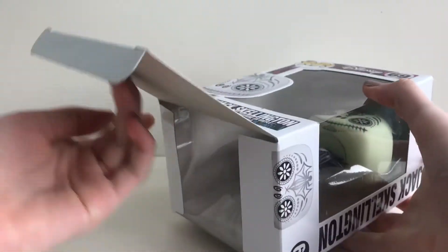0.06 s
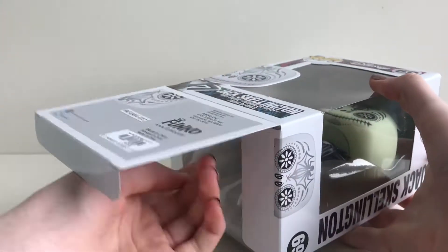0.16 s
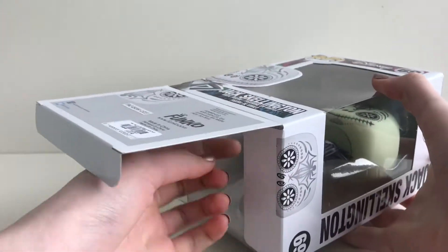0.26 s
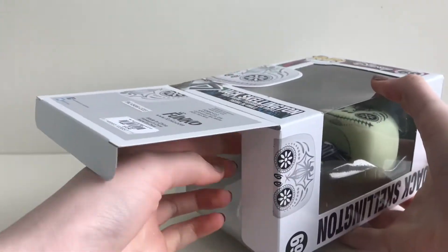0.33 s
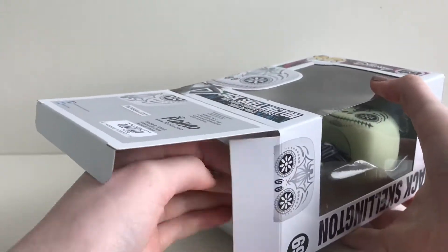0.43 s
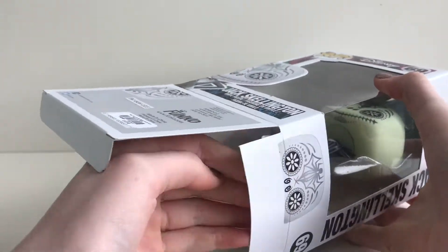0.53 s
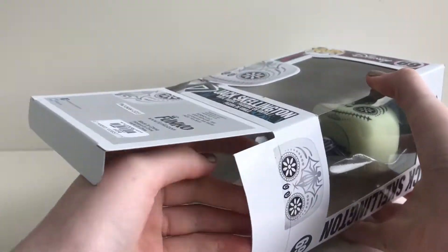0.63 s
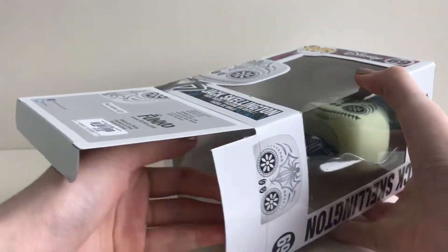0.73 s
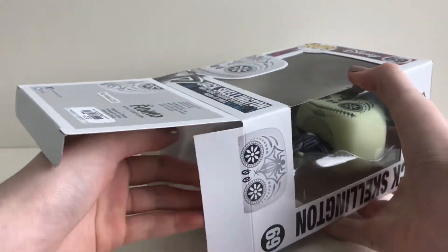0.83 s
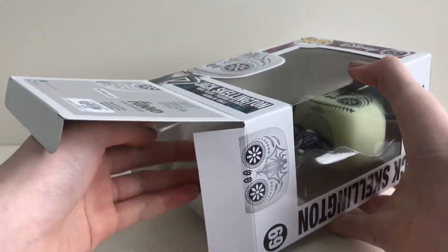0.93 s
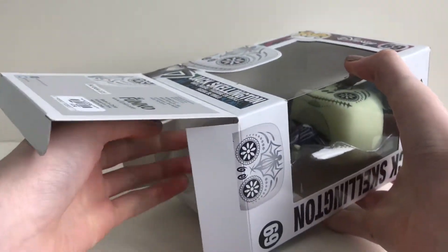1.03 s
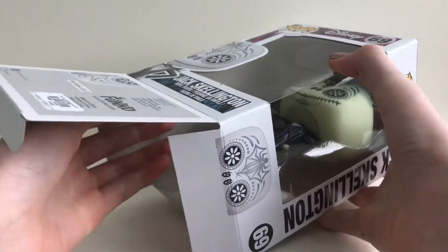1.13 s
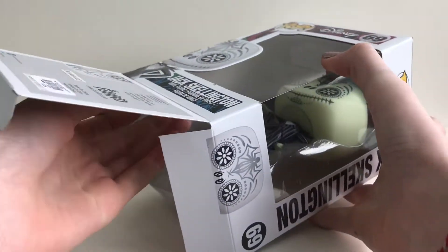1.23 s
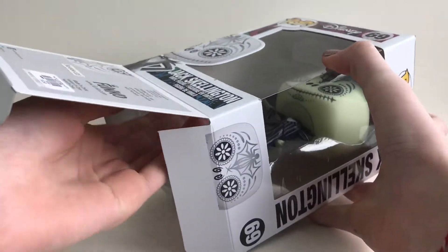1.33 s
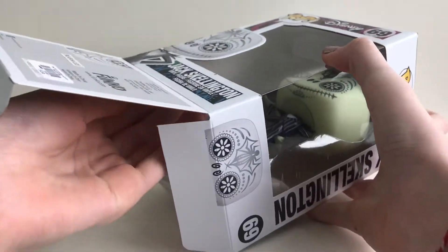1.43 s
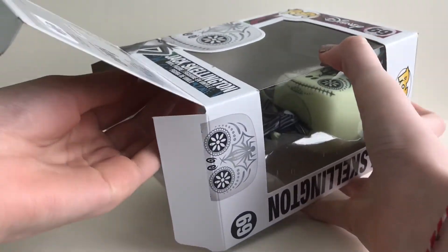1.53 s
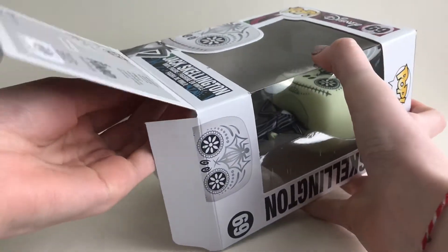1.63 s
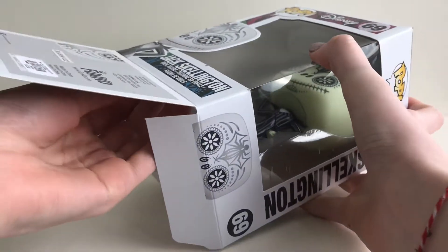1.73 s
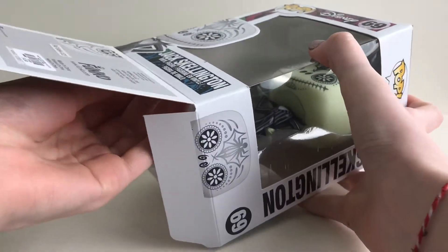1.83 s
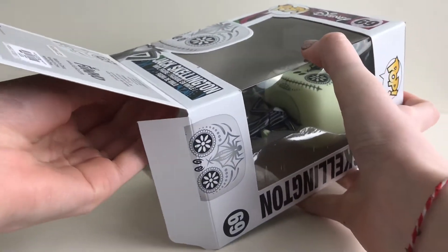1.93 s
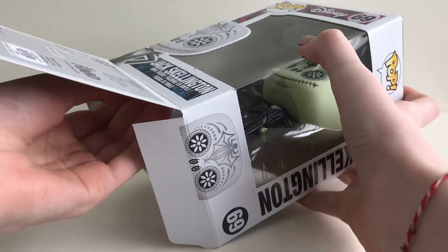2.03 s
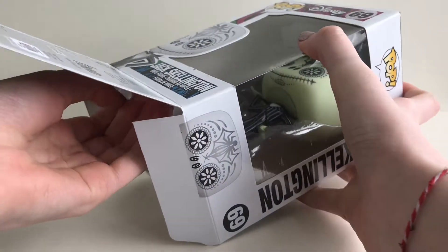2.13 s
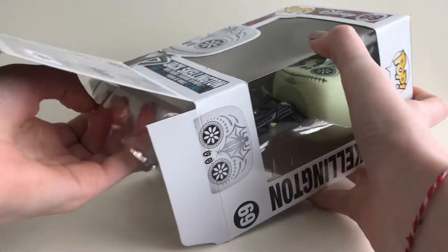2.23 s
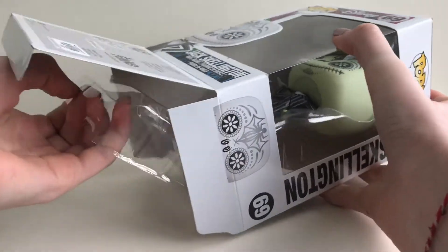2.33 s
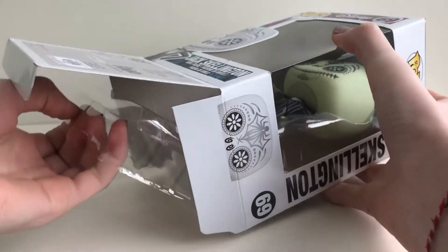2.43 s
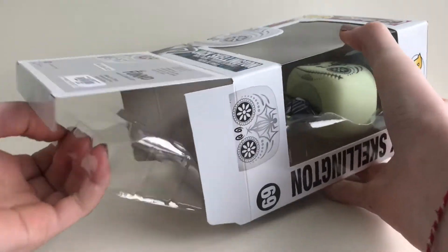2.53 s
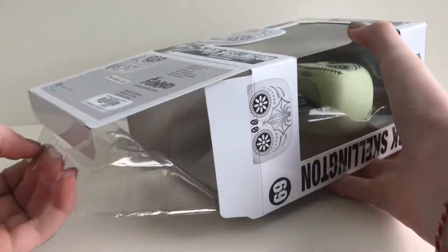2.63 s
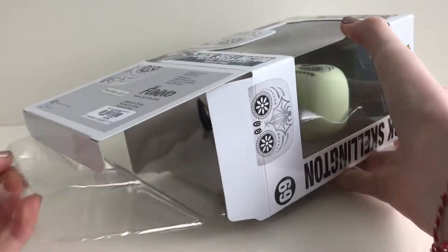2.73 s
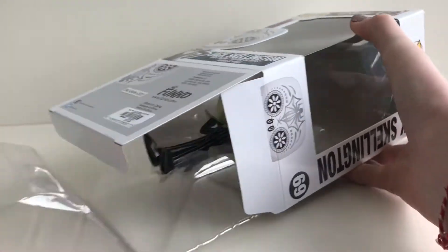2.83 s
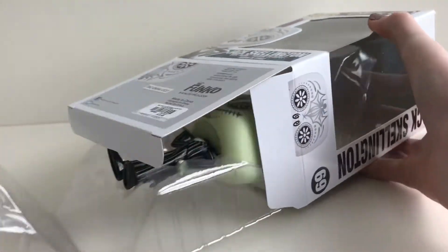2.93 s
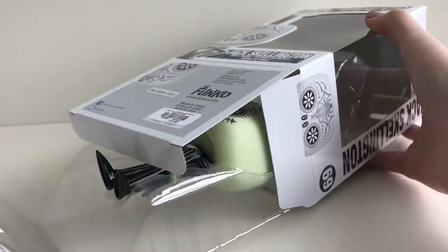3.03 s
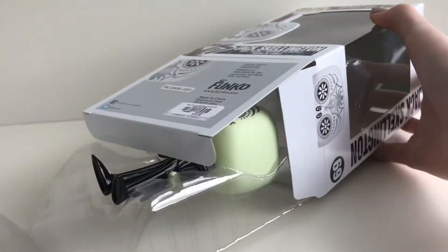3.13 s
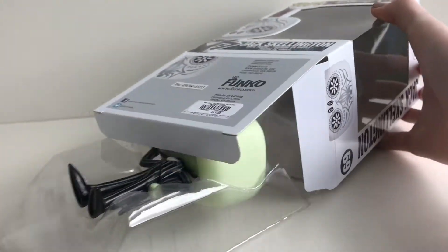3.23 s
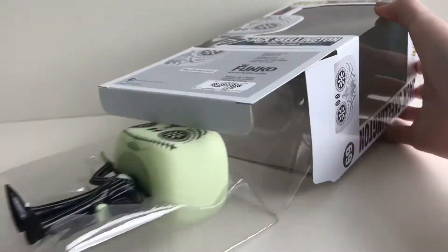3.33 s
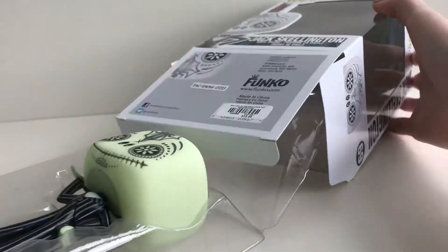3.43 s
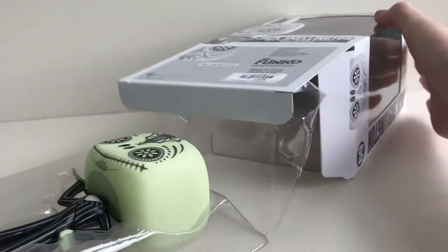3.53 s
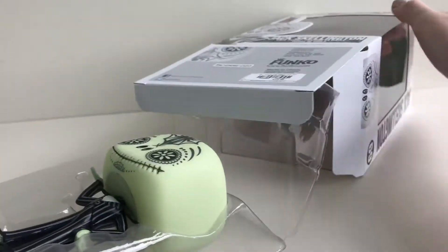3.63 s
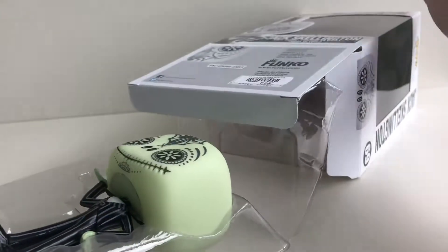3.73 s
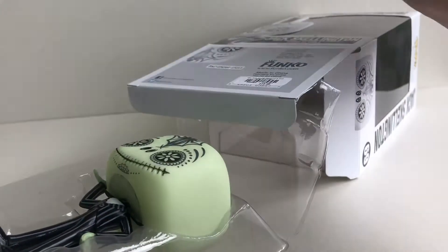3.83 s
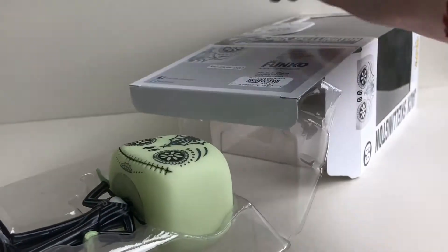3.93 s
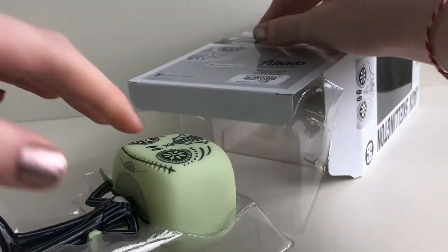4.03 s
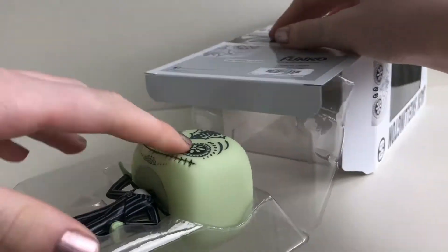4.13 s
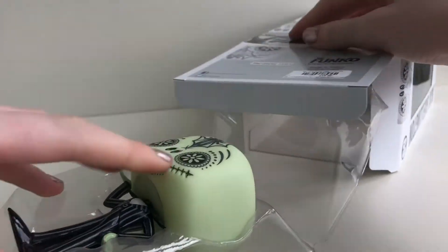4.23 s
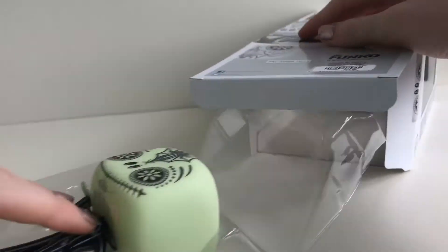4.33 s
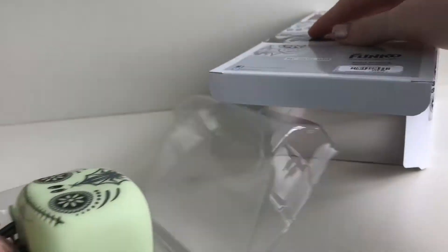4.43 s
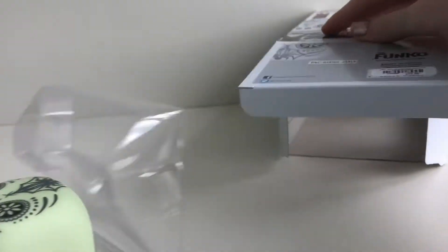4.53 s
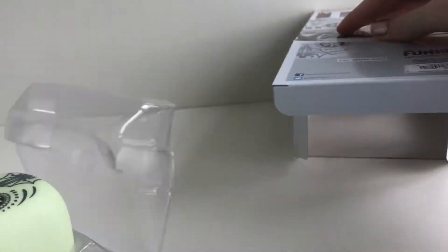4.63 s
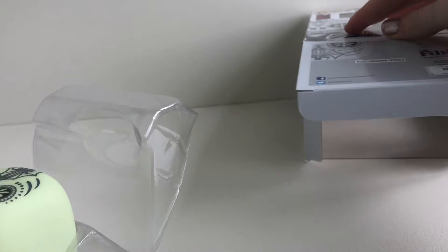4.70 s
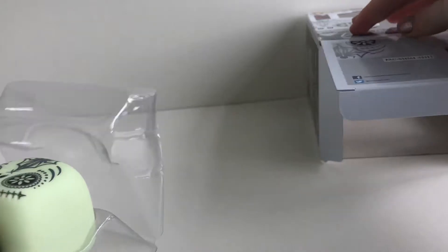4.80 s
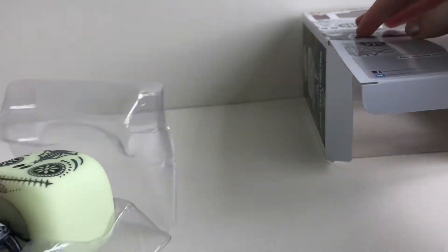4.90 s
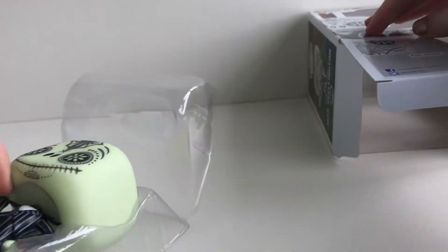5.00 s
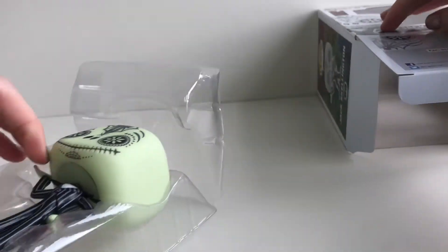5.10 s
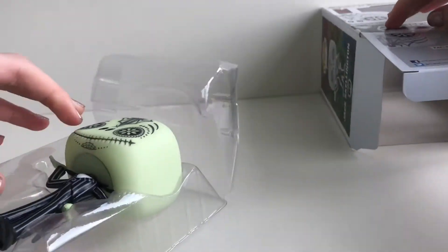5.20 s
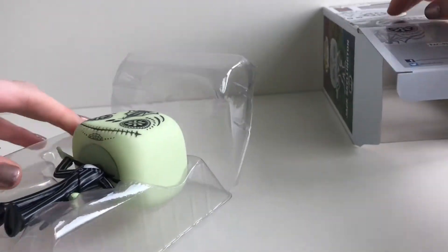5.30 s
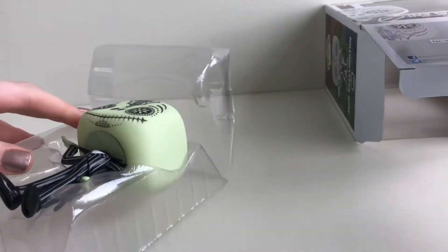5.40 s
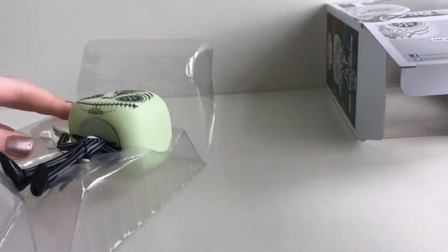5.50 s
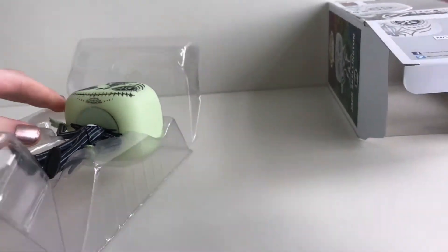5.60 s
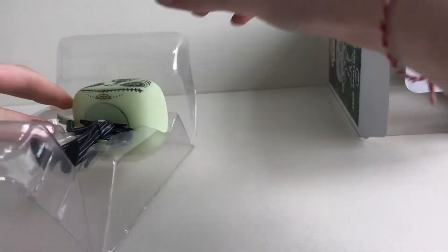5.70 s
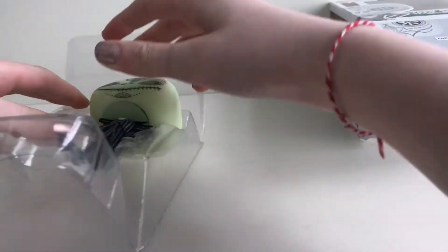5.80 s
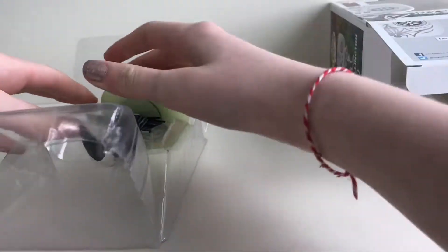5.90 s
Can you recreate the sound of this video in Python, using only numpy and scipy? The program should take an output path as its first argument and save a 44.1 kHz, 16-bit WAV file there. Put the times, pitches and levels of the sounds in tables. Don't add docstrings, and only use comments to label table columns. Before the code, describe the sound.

Soft card rubbing and knocks give way to very loud plastic snaps, crackling scrapes, hollow box thumps and a squeaky slide across a tabletop.

```python
import sys
import numpy as np
from scipy import signal
from scipy.fft import rfft, irfft
from scipy.io import wavfile
from scipy.ndimage import uniform_filter1d

SR = 44100
rng = np.random.default_rng(int(sys.argv[2]) if len(sys.argv) > 2 else 0)


def voltage_ratio(level):
    return 10 ** (np.asarray(level, float) / 20)


def unload_audio(sound):
    columns = np.transpose(np.atleast_2d(sound))
    steps = np.round(np.clip(columns, -1, 1) * 32767)
    wavfile.write(sys.argv[1], SR, steps.astype(np.int16))


N = 262615


def level(x, db):
    return x * voltage_ratio(db) / np.sqrt(np.mean(x ** 2))


def colour(x, table):
    hz, db = np.transpose(table)
    f = np.maximum(np.fft.rfftfreq(len(x), 1 / SR), 1)
    gain = voltage_ratio(np.interp(np.log(f), np.log(hz), db, -90, -90))
    return irfft(rfft(x) * gain, len(x))


def walk(rate_hz):
    hold = int(SR / rate_hz)
    steps = np.repeat(rng.standard_normal(N // hold + 1), hold)
    return 1.36 * uniform_filter1d(uniform_filter1d(steps, hold), hold)[:N]


def slips(rate_hz, spread_db, patchy_db):
    chance, size_draw, side = rng.random((3, N))
    size = voltage_ratio(np.minimum(-spread_db * np.log(size_draw + 1e-9), 15)) * np.sign(side - .5)
    return (chance < rate_hz / SR) * size * voltage_ratio(patchy_db * walk(90))


def peak(x, hz, q):
    return signal.lfilter(*signal.iirpeak(hz, q, SR), x)


def resonate(x, modes, shift_db=2):
    out = np.zeros(N)
    for k, (hz, width_hz, db) in enumerate(modes):
        grip = voltage_ratio(db + shift_db * walk(20))
        out += (-1) ** k * grip * peak(x, hz, hz / width_hz)
    return out


def swells(rows):
    roundness, floor_s = 1.41, .0015
    s, swell, fade, db = np.array(rows, float).T[:, :, None]
    coarse = np.arange(0, N + 64, 64)
    late = coarse / SR - s
    away = np.abs(late) / np.maximum(np.where(late < 0, swell, fade), floor_s)
    power = np.sum(voltage_ratio(2 * db - 20 * away ** roundness), axis=0)
    return np.interp(np.arange(N), coarse, power + 1e-16)


# f/Hz, level/(dB per Hz)
AIR_SPECTRUM = [(18, -51), (30, -28), (43, -0.5), (64, 2), (88, 3.5), (344, -25.5), (447, -25),
                (775, -27.5), (907, -24.5), (15800, -40)]
AIR_DB = -61.5 + 0.5


def background():
    hum_hz, hum_db, hum_end_s, hum_fade_s = 194, -65, 2.3, 0.43
    t = np.arange(N) / SR
    phase = 2 * np.pi * np.cumsum(hum_hz + 4.0 * walk(25)) / SR
    hum = np.sin(phase) * voltage_ratio(hum_db + 3.5 * walk(12))
    air = level(colour(rng.standard_normal(N), AIR_SPECTRUM), AIR_DB)
    return air + hum * np.clip((hum_end_s - t) / hum_fade_s, 0, 1)


# f/Hz, level/(dB per Hz)
THUMP_SPECTRUM = [(15, -47.5), (25, -6.5), (59, -3), (92, -3.5), (150, -1), (216, 0.5), (242, -3),
                  (320, -0.5), (420, -11.5), (700, -120)]
# heaviest t/s, swell/s, fade/s, level/dB
THUMPS = [(.24, 0.018, 0.03, -33.5), (.51, 0.064, 0.13, -55), (.88, 0.15, 0.14, -54),
          (1.27, 0.054, 0.015, -41), (1.4, 0.023, 0.069, -48), (1.7, 0.12, 0.06, -51),
          (1.8, 0.035, 0.045, -48), (2.3, 0.029, 0.044, -34), (2.894, 0.034, 0.021, -31),
          (3.04, 0.044, 0.078, -38), (3.44, 0.05, 0.17, -42.5), (3.67, 0.047, 0.043, -33),
          (4.125, 0.016, 0.026, -36), (4.2, 0.0097, 0.041, -36), (4.325, 0.014, 0.053, -39.5),
          (4.67, 0.056, 0.065, -39), (5.15, 0.053, 0.076, -40.5), (5.39, 0.023, 0.031, -54)]
RUMBLE_DB = -11


def table_thumps(body_power):
    shake = level(colour(slips(rate_hz=2000, spread_db=1.0, patchy_db=1.5), THUMP_SPECTRUM), 0)
    return shake * np.sqrt(swells(THUMPS) + voltage_ratio(2 * RUMBLE_DB) * body_power)


# firmest t/s, swell/s, fade/s, pressure level/dB, brightness/dB
GROPES = [(0, 0.091, 0.044, -50.5, -3), (.09, 0.026, 0.028, -51.5, -17), (.137, .008, .045, -56, 9),
          (.196, .035, .007, -54.5, 8), (.27, 0.017, 0.026, -53, -5), (.42, 0.39, 0.17, -67, 4),
          (.53, .08, 0.45, -58.5, -10), (0.462, .005, 0.013, -42.5, -14), (.825, 0.0045, 0.015, -38.5, -10),
          (.75, 0.065, 0.12, -53.5, -5.5), (.88, 0.076, 0.067, -61, -7), (.96, 0.094, 0.096, -49.5, -7),
          (1.12, 0.086, 0.21, -60.5, -4), (1.26, 0.11, 0.037, -45, -7.5), (1.4, 0.034, 0.041, -48.5, -19),
          (1.53, 0.11, 0.096, -57.5, -5), (1.645, .025, 0.034, -49, -18), (1.69, 0.027, 0.07, -46.5, -13.5),
          (1.81, 0.035, 0.079, -53.5, -10.5), (1.96, .05, .05, -65, -4), (2.09, 0.087, 0.14, -45, -15),
          (2.21, 0.088, 0.13, -39.5, -10)]
TUGS = [(2.264, 0.0029, 0.074, -31, 7.5), (2.314, 0.014, 0.025, -34.5, 3), (2.365, 0.02, 0.022, -42, -6),
        (2.389, .015, 0.031, -40.5, -11), (2.54, 0.11, 0.29, -41.5, -1), (2.634, 0.014, 0.03, -26, -8.5),
        (2.772, 0.037, 0.13, -34, -8), (2.89, 0.091, 0.063, -36, 0.5), (2.98, 0.085, 0.093, -39, -3.5),
        (3.06, 0.04, 0.13, -38.5, -17.5), (3.22, 0.13, 0.2, -45, -3.5), (3.335, 0.017, 0.13, -29.5, -7.5),
        (3.302, .006, 0.026, -39, -14.5), (3.022, .012, 0.023, -36, -6), (2.764, 0.014, 0.0091, -33.5, -8),
        (3.452, 0.046, 0.028, -31.5, -9.5), (3.485, .015, 0.015, -44, -13),
        (3.55, 0.067, 0.099, -50.5, -11.5), (3.435, .005, 0.0088, -35, 2), (3.52, .012, 0.015, -41.5, -6.5),
        (3.618, 0.0049, 0.015, -30.5, -17.5), (3.65, .016, 0.014, -30, -2), (3.681, 0.0096, .01, -29, -1),
        (3.73, 0.055, 0.071, -46, -10.5), (3.9, 0.17, 0.25, -61.5, -17.5)]
SLIDES = [(4.125, 0.033, 0.037, -50, -18.5), (4.183, 0.0026, 0.17, -37.5, -12.5),
          (4.301, 0.039, 0.18, -40.5, -11.5), (4.47, 0.12, 0.12, -33, -11), (4.58, 0.056, 0.1, -34, -14),
          (4.74, 0.095, 0.28, -42.5, -8.5), (4.87, 0.051, 0.18, -37, -14.5), (5.03, 0.03, 0.16, -42, -10.5),
          (5.161, 0.076, 0.073, -36.5, -11), (5.359, .002, 0.028, -45.5, -9.5),
          (5.383, 0.0025, 0.15, -40.5, -13), (5.5, 0.0055, 0.1, -40.5, -10), (5.565, 0.027, 0.026, -48, -9),
          (5.715, .015, .015, -49, -11), (5.235, 0.016, 0.013, -46, -20.5), (4.49, .012, 0.0083, -39, -3),
          (5.618, 0.086, 0.097, -41.5, -8.5), (5.78, 0.078, 0.38, -59.5, 5), (5.95, 0.15, .1, -48, -4.5)]


def stroke_powers():
    panel_share = 0.53
    body, panels, hiss = [], [], []
    for table, panel_db in ((GROPES, -0.5), (TUGS, 0), (SLIDES, -0.5)):
        for s, swell, fade, db, bright_db in table:
            body.append((s, swell, fade, db))
            panels.append((s, swell, fade, db + panel_db + panel_share * bright_db))
            hiss.append((s, swell, fade, db + bright_db))
    return swells(body), swells(panels), swells(hiss)


# f/Hz, width/Hz, level/dB
BOX_MODES = [(360, 18, -4.5), (543, 71, -2.5), (690, 100, -4), (790, 49, 1.5), (1005, 84, -6),
             (1181, 43.5, -5.5)]
# f/Hz, width/Hz, level/dB
TRAY_MODES = [(358, 31, -1.5), (620.6, 53, 2), (788, 68, 2), (870, 190, -5.5), (986, 126, -5.5),
              (1184, 144, -12)]
TRAY_ALONE_S = 4.0


def rubbed_body(drag):
    box, tray = level(resonate(drag, BOX_MODES), 0), level(resonate(drag, TRAY_MODES), 0)
    return np.where(np.arange(N) / SR < TRAY_ALONE_S, box, tray)


# f/Hz, width/Hz, level/dB
FINGER_MODES = [(1500, 140, 7.5), (2100, 1250, 2), (2750, 1020, 2.5), (3050, 460, 4), (3950, 810, -1)]
# f/Hz, width/Hz, level/dB
PANEL_MODES = [(1500, 110, -5), (1700, 240, -7.5), (2125, 600, -13), (2524, 100, -9.5), (3270, 1100, -17.5)]
PULL_S = 2.0


def rubbed_panels(drag):
    fingers, panels = level(resonate(drag, FINGER_MODES), 0), level(resonate(drag, PANEL_MODES), 0)
    return np.where(np.arange(N) / SR < PULL_S, fingers, panels)


# f/Hz, level/(dB per Hz)
HISS_SPECTRUM = [(2060, -74.5), (3500, -8), (3870, -4.5), (4480, -1.5), (4860, -6.5), (5580, 0), (6410, -3),
                 (8570, -4), (10100, -8.5), (11700, -1.5), (13800, -9.5), (15100, -5), (15800, -6)]
# f/Hz, width/Hz, level/dB
FILM_MODES = [(4450 * 1.21 ** k, 600 * 1.21 ** k, 0) for k in range(7)]
CRACKLE_DB = -14.5


def film_hiss(drag):
    fine = slips(rate_hz=12000, spread_db=2.0, patchy_db=1.5)
    surface = colour(drag + 5.0 * fine, HISS_SPECTRUM)
    hiss = level(0.16 * surface + resonate(surface, FILM_MODES, shift_db=1.85), 0)
    pops = slips(rate_hz=220, spread_db=4.0, patchy_db=3.0)
    crackle = level(resonate(pops, PANEL_MODES[2:] + FILM_MODES), CRACKLE_DB)
    return hiss + np.where(np.arange(N) / SR < TRAY_ALONE_S, 1, .7) * crackle


def rubbing():
    drag = slips(rate_hz=4000, spread_db=3.0, patchy_db=2.0)
    body_power, panel_power, hiss_power = stroke_powers()
    body = np.sqrt(body_power) * rubbed_body(drag)
    panels = np.sqrt(panel_power) * rubbed_panels(drag)
    hiss = np.sqrt(hiss_power) * film_hiss(drag)
    return body + panels + hiss + table_thumps(body_power)


def rub_modes(rows, q):
    drag = slips(rate_hz=9000, spread_db=2.5, patchy_db=1.5)
    out = np.zeros(N)
    for *stroke, hz in rows:
        tone = peak(peak(drag, hz, min(q, 2.5)), hz, q)
        out += np.sqrt(swells([stroke])) * level(tone, 0)
    return out


# loudest t/s, swell/s, fade/s, level/dB, f/Hz
BOOMS = [(.24, .015, 0.054, -45, 74), (.235, 0.0082, 0.019, -37, 332), (.06, .03, 0.071, -56, 400),
         (.9, 0.089, 0.087, -50, 65), (1.72, 0.11, 0.073, -48.5, 87), (3.616, .004, 0.016, -40, 394),
         (3.62, 0.0047, 0.028, -30, 160.8), (3.97, 0.12, 0.077, -66, 217), (5.94, 0.043, .04, -50, 152)]


def booms():
    return rub_modes(BOOMS, q=2.5)


# loudest t/s, swell/s, fade/s, level/dB, f/Hz
CREAKS = [(.168, 0.03, 0.035, -45, 3730), (3.87, .08, .1, -62, 1950), (.33, 0.1, 0.065, -59.5, 3700),
          (.47, 0.089, 0.062, -59.5, 3270), (.58, 0.0069, 0.016, -49.5, 3200),
          (.77, 0.066, .08, -56.5, 3330), (.93, 0.036, 0.041, -56, 3420), (2.475, 0.018, .05, -53.5, 8400),
          (2.615, .002, 0.0053, -21, 4600), (2.26, 0.0035, 0.023, -24.5, 2140),
          (1.248, 0.004, 0.0047, -27, 4540), (5.43, .03, 0.044, -55, 4000),
          (1.77, 0.044, 0.036, -54.5, 3250), (2.28, 0.0075, 0.016, -23.5, 4600),
          (3.016, 0.0016, 0.021, -31, 1950), (4.32, 0.047, 0.041, -36, 1814),
          (4.415, 0.017, 0.012, -39.5, 2640), (4.47, 0.044, .03, -35.5, 1440),
          (5.65, .05, 0.057, -55.5, 4270), (5.89, 0.07, 0.073, -57, 5700), (5.68, 0.18, 0.047, -46.5, 870),
          (5.92, 0.076, 0.051, -47, 870)]


def creaks():
    return rub_modes(CREAKS, q=7.)


# loudest t/s, swell/s, fade/s, level/dB, f/Hz
SINGS = [(1.998, .006, .006, -60, 3280), (2.54, 0.034, 0.1, -47, 1595), (3.13, 0.013, .02, -44, 1990),
         (3.2, 0.097, 0.095, -46, 696), (3.365, 0.033, 0.012, -39, 4360), (3.39, 0.025, 0.053, -42, 1920),
         (3.41, .03, 0.026, -48, 3510), (3.485, .01, .01, -38.5, 3050), (4.212, .015, 0.029, -37, 771),
         (4.21, 0.021, .03, -43, 1890), (4.33, 0.037, .03, -37.5, 2194), (4.34, .02, 0.018, -39, 1112),
         (4.43, 0.048, 0.06, -38, 649), (4.475, .025, 0.033, -42.5, 1457), (4.48, 0.027, 0.027, -36.5, 945),
         (4.57, 0.035, 0.078, -33, 627), (4.9, 0.036, 0.048, -39.5, 631), (5.04, 0.024, 0.043, -41, 769),
         (5.2, 0.057, 0.04, -38.5, 607), (5.57, .07, 0.087, -42, 616), (5.6, .06, 0.091, -48, 1677),
         (5.57, 0.069, 0.13, -40.5, 790)]


def singing_ribs():
    return rub_modes(SINGS, q=28.)


# t/s, peak level/dB, f/Hz, t60/s
PINGS = [(1.2452, -9, 2025, 0.023), (1.2462, -15.5, 798, 0.046), (1.243, -7, 9960, 0.013),
         (1.2637, -25, 1950, .03), (1.8456, -27.5, 993, 0.032), (1.8452, -27.5, 800, .04),
         (2.2522, -12.5, 803, 0.036), (2.2518, -9, 8200, .02), (2.2612, -7, 8500, 0.018),
         (2.2534, -11, 1196, 0.041), (2.292, -18, 5420, 0.052), (2.6135, -18.5, 785, 0.045),
         (3.1058, -17.5, 1946, 0.028), (3.16, -27.5, 760, 0.034), (3.3315, -21.5, 790, .04),
         (3.4262, -17.5, 846, .05), (3.4262, -19, 4400, 0.022), (3.612, -18.5, 1048, .05),
         (1.845, -26, 3250, .02), (2.112, -24, 800, .04), (2.159, -28, 780, .04),
         (2.6135, -16, 1080, 0.028), (5.381, -35, 790, .04), (5.498, -33, 626, .06),
         (.683, -34, 564, 0.031), (0.9378, -25, 1500, 0.045)]


def pings():
    rise_ms = .4
    out, t = np.zeros(N), np.arange(4096) / SR
    for s, db, hz, t60_s in PINGS:
        envelope = 1000. ** (-t / t60_s) * (1 - np.exp(-t * 1000 / rise_ms))
        i = int(s * SR)
        out[i:i + 4096] += voltage_ratio(db) * np.sin(2 * np.pi * hz * t) * envelope
    return out


def ring(t, lo_hz, hi_hz, t60_s, slope_db_oct, count=24):
    place, phase = rng.random((2, count, 1))
    up = (hi_hz / lo_hz) ** ((np.arange(count)[:, None] + place) / count)
    tones = np.sin(2 * np.pi * (lo_hz * up * t + phase))
    decay = 1000. ** (-t / t60_s * np.sqrt(up))
    return np.sum(voltage_ratio(slope_db_oct * np.log2(up)) * tones * decay, axis=0)


def buckles(rows, slip_ms, tilt_db_oct):
    lead, ring_late_ms, crack_colour_db = 256, .8, 4
    out, t = np.zeros(N + 4096), np.arange(4096) / SR
    fall = slip_ms / 1000
    late = lead + int(ring_late_ms * SR / 1000)
    onset = np.clip((t * SR - 244) / 12, 0, 1)
    for s, db, panel_db, box_db in rows:
        rough = rng.standard_normal(4096) * (1 - np.exp(-t / (.15 * fall)))
        slip = rough * np.exp(-t / fall)
        burst = rough * (np.exp(-2 * t / fall) + 0.19 * np.exp(-t / (2 * fall)))
        spectrum = [(hz, d + tilt_db_oct * np.log2(hz / 7000) + crack_colour_db * rng.standard_normal())
                    for hz, d in HISS_SPECTRUM]
        crack = colour(np.roll(burst, lead), spectrum) * onset
        panel_ring = ring(t[:1800], lo_hz=1150, hi_hz=3800, t60_s=.022, slope_db_oct=-3.5)
        box_ring = ring(t[:1800], lo_hz=300, hi_hz=1200, t60_s=.045, slope_db_oct=.8)
        panel = np.roll(signal.fftconvolve(slip, panel_ring)[:4096], late)
        box = np.roll(signal.fftconvolve(slip, box_ring)[:4096], late)
        i = int(s * SR) - lead
        for part, part_db in ((crack, -1), (panel, panel_db + 0.5), (box, box_db)):
            out[i:i + 4096] += voltage_ratio(db + part_db) * part / np.abs(part).max()
    return signal.sosfilt(signal.butter(2, 220, "high", fs=SR, output="sos"), out[:N])


# t/s, crack peak level/dB, panel level/dB re crack, box level/dB re crack
TICKS = [(.5285, -50, 4, 4), (.864, -46, -10, -14), (.92, -38, -12, -4), (2.057, -33, -4, -9),
         (2.078, -48, -8, -9), (2.1405, -35, 3, -21), (2.7474, -29, -3, -9), (2.785, -27, 5, -11),
         (2.9245, -34, -4, 14), (2.95, -34, -10, 8), (3.0148, -33.5, 0, 5), (3.3176, -28, -4, -4),
         (3.3315, -33.5, 10.5, 11), (3.363, -30, -4, 7), (3.53, -38.5, 7, 8), (3.6195, -33.5, 7, 17),
         (4.2028, -40, 4, 6), (4.2432, -36, 10, 4), (4.2762, -40, 7, 14), (4.3051, -32, 4, 0),
         (4.4518, -37, 3, 0), (4.581, -41, 2, 6), (4.669, -31, 5, 9), (4.9267, -44, 5, 10),
         (5.1148, -44, 9, 3), (5.1377, -42, 5, 7), (5.2779, -57, 5, -1), (5.3921, -42.5, 11, -10),
         (5.452, -43.5, 10, 0), (5.5622, -45, 9, 2), (5.6036, -49, 6, 1)]


def rib_ticks():
    return buckles(TICKS, slip_ms=1.23, tilt_db_oct=-5.5)


# t/s, crack peak level/dB, panel level/dB re crack, box level/dB re crack
KNOCKS = [(.2304, -36, -10, 12), (.5062, -41, -2, 1), (.9464, -35.5, 3, 3), (1.2635, -49, 14, -7),
          (1.3848, -39, -3.5, -1), (1.4144, -50.5, 7, 14.5), (1.5114, -47.5, 3, 9.5), (1.6734, -51, 0, 19),
          (1.6914, -46.5, -18, 13), (1.7114, -42, -16, 9), (1.9224, -46.5, 3.5, 5), (1.9859, -48, -1, 4),
          (2.0238, -40.5, 3, 6.5), (2.1204, -26, -6, 3), (2.1804, -36.5, 7, -11), (2.2109, -38.5, -2, -3),
          (2.2264, -41, 14.5, -4), (2.9064, -29.5, -24, 12), (2.8944, -39, -4, 23.5), (3.074, -44, -10, 22),
          (3.1053, -36, 15.5, 20), (3.1594, -39, 6, 9), (3.2965, -45, -19, 19.5), (3.3334, -34, -5, 15),
          (3.6117, -23.5, 5.5, 8), (4.1194, -47.5, 4, 9), (4.6814, -33.5, -12, 10.5),
          (5.3812, -46, 10, -23.5), (5.4974, -55, -22, -3)]


def box_knocks():
    return buckles(KNOCKS, slip_ms=1.5, tilt_db_oct=-4)


# t/s, crack peak level/dB, panel level/dB re crack, box level/dB re crack
CREASES = [(.2124, -35, -2, -6), (.4618, -45, -1, 3.5), (.6785, -58, -16, -17), (.6818, -18, -17.5, -18),
           (.6934, -24.5, -9.5, -12), (.9098, -30, -5, -12), (.9702, -30, -8, -1),
           (1.1827, -30.5, -7.5, -15.5), (1.2376, -48.5, -22, -10), (2.0482, -31.5, -6, 2),
           (2.1585, -26, -4, -1.5), (2.1664, -26, -1.5, -12), (2.1904, -29, -20, -10),
           (2.2714, -10, -19, -29), (2.2914, -14, -25.5, -17.5), (2.5157, -27, -22.5, -10.5),
           (2.5661, -22, -10.5, -17), (2.6125, 0.5, -10.5, -19.5), (2.6264, -7.5, -8, -50.5),
           (2.6374, -33.5, 10.5, -13), (2.6564, -10.5, -35, -16), (2.7573, -29.5, -2, 1),
           (2.7977, -16.5, -6.5, -7.5), (3.4256, -23.5, 9.5, 9.5), (4.0916, -44.5, -3.5, -7.5),
           (4.1828, -41.5, 4.5, -3), (5.3562, -42, -22, -15)]


def crease_pops():
    return buckles(CREASES, slip_ms=1.7, tilt_db_oct=-9)


# t/s, crack peak level/dB, panel level/dB re crack, box level/dB re crack
SNAPS = [(.5734, -39, -14, -23), (.824, -36, -3, 0), (.8869, -21, -2, -5.5), (.9378, -18, -6, -7.5),
         (1.0016, -25.5, -8, -6), (1.0171, -25, -11, -16), (1.1413, -39, -3, -32),
         (1.2057, -21.5, -11, -10.5), (1.2436, 2, -9, -17), (1.7464, -45, -13, -23),
         (1.7938, -41.5, -10, -11), (1.8447, -14, -9, -15), (2.1116, -27, -0.5, -3.5),
         (2.2518, -4.5, -7, -22), (2.2598, 1, -11, -18.5), (2.2964, -8, -11, -44), (2.3144, -13, -24, -25),
         (2.6499, -12.5, -3, -38), (2.8674, -20, -25, -4), (2.2548, -4, -13, -13), (3.0244, -24.5, -2, -9),
         (3.6354, -31, 3, -15), (3.6486, -30, 9, -14), (3.6714, -30, 8, 16), (3.682, -12, -2, -11),
         (4.3171, -24, -2.5, -24.5), (4.4774, -34, 1, -17), (4.6588, -18.5, 1.5, -3), (4.6634, -17, -4, -3),
         (5.9164, -34, -16, 0)]


def film_snaps():
    return buckles(SNAPS, slip_ms=2.18, tilt_db_oct=-0.23)


# f/Hz, t60/s
ROOM_T60 = [(100, 0.22), (1000, 0.24), (4000, 0.26), (15000, 0.66)]
ROOM_DB, ROOM_TILT_DB_OCT = -11.5, -6.5


def room(x):
    out, (hz, t60_s) = np.zeros(N), np.transpose(ROOM_T60)
    edges = 60 * 2 ** np.arange(0, 8.6, .5)
    for lo, hi in zip(edges[:-1], np.minimum(edges[1:], .47 * SR)):
        band = signal.butter(2, (lo, hi), "band", fs=SR, output="sos")
        keep = 1e6 ** (-1 / (np.interp(np.log(lo), np.log(hz), t60_s) * SR))
        stored = signal.lfilter([1 - keep], [1, -keep], signal.sosfilt(band, x) ** 2)
        db = ROOM_DB + ROOM_TILT_DB_OCT * max(np.log2(lo / 2000), 0)
        out += np.sqrt(stored) * level(signal.sosfilt(band, rng.standard_normal(N)), db)
    return np.concatenate([np.zeros(150), out])[:N]


def scene():
    tones = booms() + creaks() + singing_ribs() + pings()
    cracks = rib_ticks() + box_knocks() + crease_pops() + film_snaps()
    near = rubbing() + tones + cracks
    return (background() + room(near) + near)[None]


def low_pass(x):
    return signal.sosfilt(signal.butter(12, 16890, fs=SR, output="sos"), x)


def record(dry):
    notch_hz, notch_width_hz, notch_share = 10220, 130, 0.08
    low_cut_hz, top_hz = 42, 15850
    dip = peak(dry, notch_hz, notch_hz / notch_width_hz)
    clipped = np.clip(dry - notch_share * dip, -1, 1)
    low_cut = signal.sosfilt(signal.butter(3, low_cut_hz, "high", fs=SR, output="sos"), clipped)
    cut = signal.sosfilt(signal.ellip(8, .2, 60, top_hz, fs=SR, output="sos"), low_cut)
    return low_pass(np.clip(cut, -.99, .99))


dry = scene()
out = record(dry)
unload_audio(out)
```